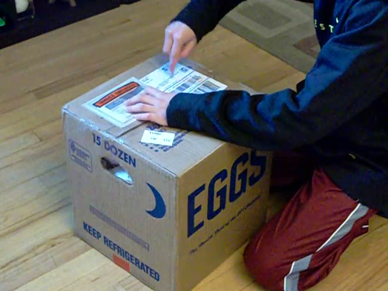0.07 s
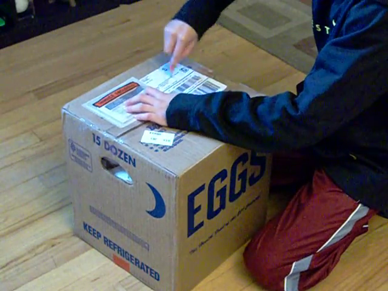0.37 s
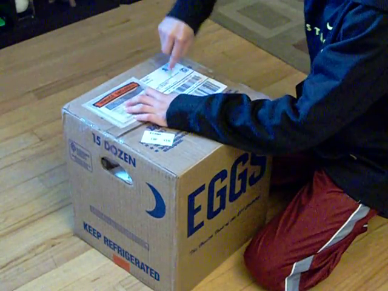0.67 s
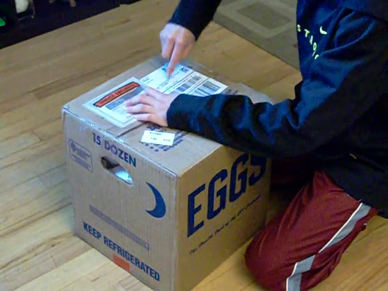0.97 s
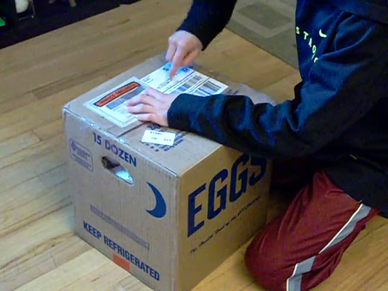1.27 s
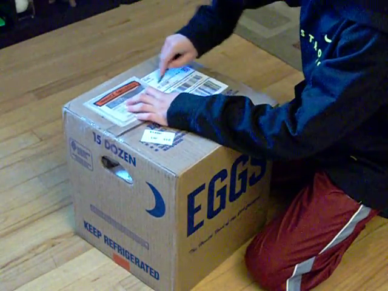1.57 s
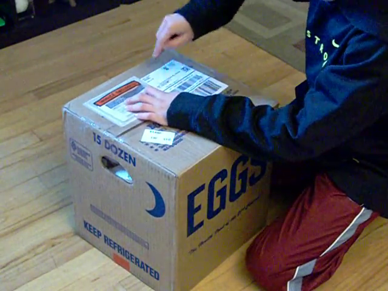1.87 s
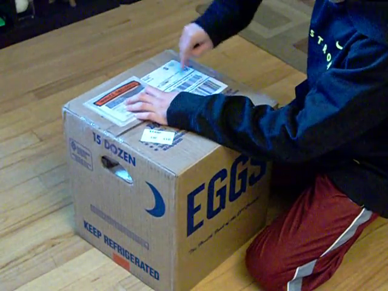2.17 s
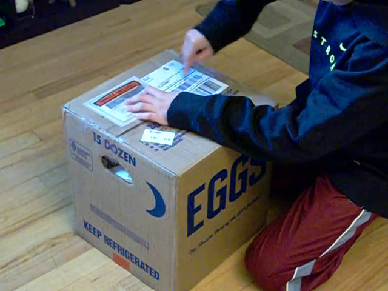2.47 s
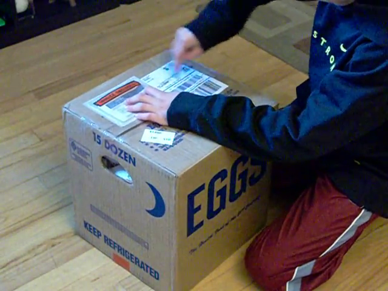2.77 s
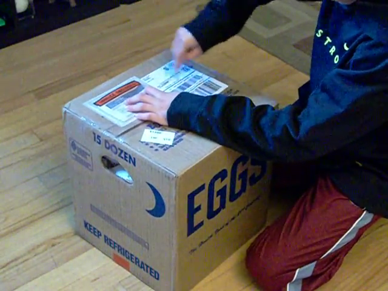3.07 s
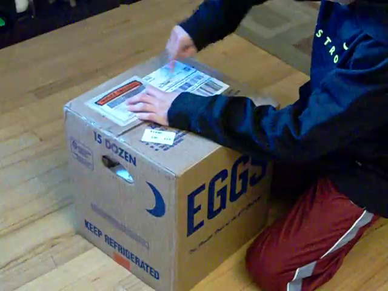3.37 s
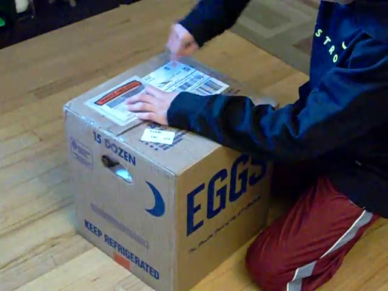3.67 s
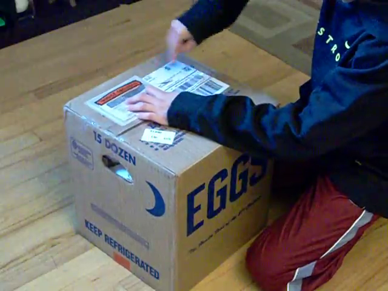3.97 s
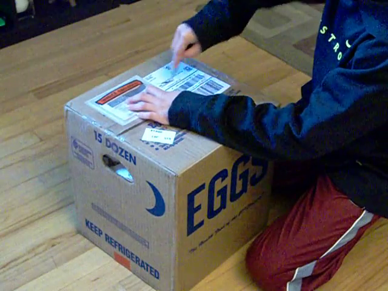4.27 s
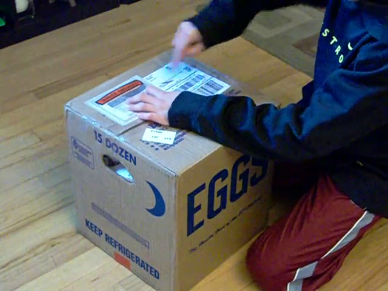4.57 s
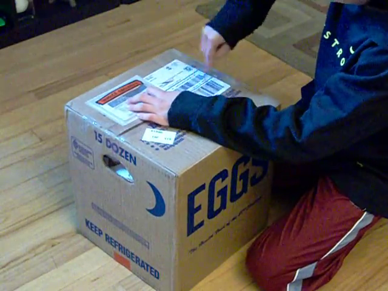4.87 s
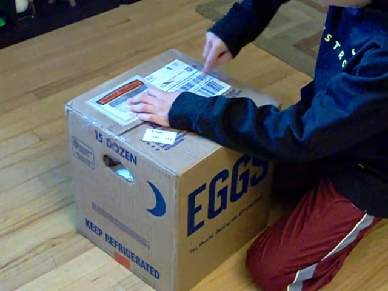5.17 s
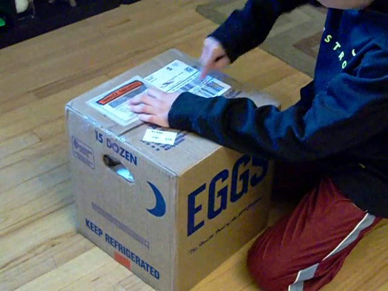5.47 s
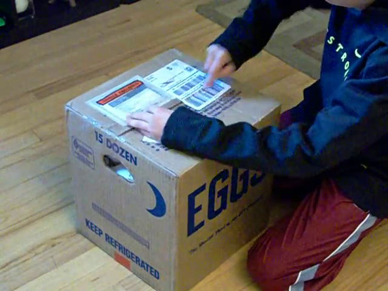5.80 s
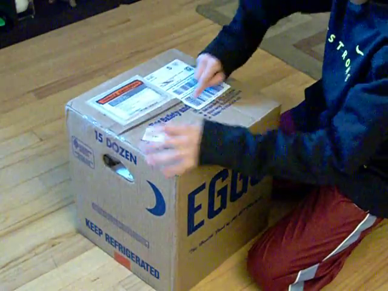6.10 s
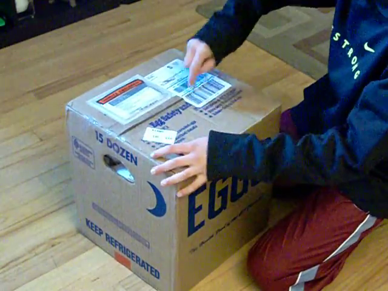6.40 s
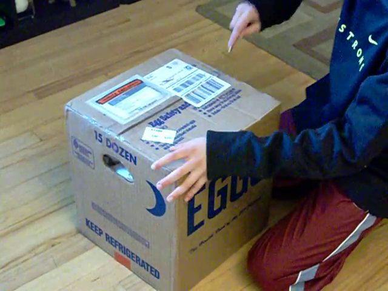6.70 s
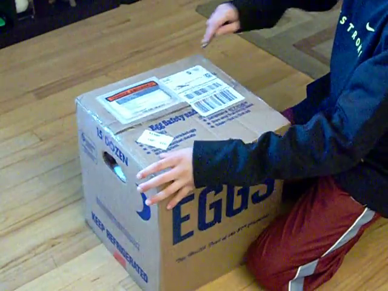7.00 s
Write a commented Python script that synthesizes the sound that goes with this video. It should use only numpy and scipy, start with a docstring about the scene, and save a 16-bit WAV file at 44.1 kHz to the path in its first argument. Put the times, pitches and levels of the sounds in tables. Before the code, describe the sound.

A fingernail lands on the taped lid of a big cardboard box and drags across it, about three strokes a second. Each stroke gives a hollow knock and a short rasp, with crisp snaps off creases and a plastic label. A few thin squeaks slip in. Near the end a hand slides softly over the cardboard among tiny clicks. It sounds close, in a small room with faint rumble and hiss.

```python
"""A fingernail lands on the taped top of a big cardboard box and drags across it, about three strokes a second.
Each impact knocks the hollow box; stick-slip friction makes the nail rasp over the tape and the fingertip
squeak, and the nail snaps off creases and the edges of a plastic label. The spot on the lid colours a
stroke's landing, drag and snaps alike. The panels and enclosed air resonate briefly, and a room with a
wooden floor answers. Behind it lie a sliding hand, small ticks, rustling sleeves, faint rumble and hiss."""
import sys
import numpy as np
from scipy import signal
from scipy.fft import rfft, irfft
from scipy.io import wavfile
from scipy.ndimage import uniform_filter1d

SR = 44100
rng = np.random.default_rng(int(sys.argv[2]) if len(sys.argv) > 2 else 0)


def store_pcm(level_fs):
    """Save levels as 16-bit WAV."""
    pcm = np.round(np.clip(level_fs, -1, 1) * 32767).astype(np.int16)
    wavfile.write(sys.argv[1], SR, np.atleast_2d(pcm).T)


N = 310464
FREQS = np.fft.rfftfreq(16384, 1 / SR)
# Strokes of the finger. Each row: start and length in seconds; relative levels in dB of landing, nail
# click, rasp, swell along the drag, push into the box and stiffness of the spot; film resonance in Hz.
STROKES = [(0, 0.18, -34, -33, -59.5, 0, -3, 10, 5700), (0.293, .17, -12, -24, -56, -8, -2, 6, 6200),
           (0.5754, .16, -15, -23.5, -57.5, -2.5, 3.5, 5.5, 2750),
           (0.923, 0.14, -18, -22, -54.5, 6, -2, -0.5, 6000),
           (1.234, 0.069, -12.5, -19, -49.5, 9, 2.5, 4.5, 2660),
           (1.5362, .18, -22.5, -33, -64, 16.5, -1.5, 5, 2390),
           (2.0073, .15, -18.5, -26, -61, 14, 3.5, 4.5, 2000),
           (2.342, 0.12, -20.5, -29, -56, 7.5, -2.5, 5.5, 2980),
           (2.634, 0.13, -22.5, -24.5, -55, -5.5, -4, 6, 1930),
           (2.9207, 0.16, -20.5, -22, -59, -4, 0.5, -2.5, 3140),
           (3.225, 0.067, -22.5, -31, -53.5, 1.5, 1.5, 7.5, 1440),
           (3.5324, 0.099, -21, -29, -54, -17, 2, 6.5, 1480),
           (3.8127, 0.14, -19.5, -27, -57.5, 10.5, 2, 4, 3720),
           (4.109, 0.13, -15.5, -23.5, -53.5, -1, -3, 6, 1230),
           (4.3815, .145, -19.5, -20, -53, 4.5, -2, -4, 4200),
           (4.6922, .18, -15, -18, -48, 2.5, -5.5, -3, 7060),
           (5.0624, 0.18, -16.5, -22, -49.5, 0, -3.5, -5, 4050),
           (5.424, .16, -15.5, -17.5, -49.5, 5, -2.5, -1, 6900),
           (5.7791, 0.13, -13, -18, -50, 17.5, -7, -1, 7040),
           (6.12, 0.126, -12, -24, -57, 33, -2.5, -2, 7200),
           (6.4798, 0.16, -17.5, -26.5, -58, 18.5, -7.5, -3.5, 2110)]


def undb(db):
    """Amplitude ratio for a level in decibels."""
    return 10 ** (np.asarray(db) / 20)


def slope(points):
    """Gain in dB at every frequency, joining (Hz, dB) points on a log axis."""
    hz, db = np.transpose(points)
    return np.interp(np.log(FREQS + 1), np.log(hz), db)


def resonances(modes):
    """Gain in dB of Lorentzian peaks, each given as (Hz, width in Hz, height in dB)."""
    return sum(db / (1 + (2 * (FREQS - hz) / width) ** 2) for hz, width, db in modes)


def response(db):
    """Minimum-phase impulse response with the given gain in dB."""
    cepstrum = irfft(np.log(undb(db)))
    half = len(cepstrum) // 2
    cepstrum[1:half] *= 2
    cepstrum[half + 1:] = 0
    return irfft(np.exp(rfft(cepstrum)))[:half]


def through(x, h):
    """Linear filtering: convolution with an impulse response."""
    return signal.fftconvolve(x, h)[:len(x)]


def add(track, s, sound):
    """Superposition: a sound joins the track at s seconds."""
    i = max(int(s * SR), 0)
    track[i:i + len(sound)] += sound[:N - i]


def walk(count, rate_hz):
    """Slow random modulation with a spread near 1."""
    place = np.arange(count) * rate_hz / SR
    return np.interp(place, np.arange(count), rng.standard_normal(count))


def crackle(envelope, evenness):
    """A noise burst of unit energy; evenness from 0 to 1 whitens its spectrum."""
    spectrum = rfft(rng.standard_normal(len(envelope)) * envelope)
    burst = irfft(spectrum / np.abs(spectrum) ** evenness, len(envelope))
    return burst / np.linalg.norm(burst)


def ambience(waver_db=1.3):
    """Broadband noise of the house: rumble and hiss, wavering slightly in amplitude."""
    # Noise spectrum. Each row: frequency in Hz, gain in dB.
    spectrum = [(20, -31.5), (32, -31), (50, -31.5), (80, -31), (140, -39.5), (220, -44), (400, -47),
                (800, -53.5), (1500, -55), (3000, -60), (7000, -63.5)]
    noise = through(rng.standard_normal(N), response(slope(spectrum)))
    return noise * undb(waver_db * walk(N, rate_hz=10))


def sleeves(level_db=-64, swell_db=3, grains_hz=900):
    """Cloth friction as the arms move: sparse random impulses sum to a faint rustle."""
    grains = (rng.random(N) < grains_hz / SR) * rng.standard_normal(N)
    colour = response(slope([(300, -14.5), (2000, -7.0), (4000, 3.0), (7000, -10)]))
    return through(grains / np.std(grains), colour) * undb(level_db + swell_db * walk(N, rate_hz=20))


def ticks(decay_s=0.001):
    """Tiny bright clicks, so close that only their direct sound is heard."""
    # Dry clicks. Each row: start in seconds, relative level in dB.
    clicks = [(5.6652, -13.5), (6.034, -24), (6.0842, -12.5), (6.107, -12), (6.4692, -14), (6.7882, -17.5),
              (6.885, -22.5)]
    out = np.zeros(N)
    t = np.arange(SR // 100) / SR
    colour = response(slope([(500, -13), (3500, -4), (7000, -8.5)]))
    for s, db in clicks:
        add(out, s, undb(db) * through(crackle(np.exp(-t / decay_s), evenness=0), colour))
    return out


def echoes(t60_s=0.25, late_t60_s=0.65, late_db=-17, build_s=0.0015, floor_s=0.0052, floor_db=-4):
    """Room impulse response: direct sound, a scattered floor reflection and a two-slope diffuse decay."""
    # Spectrum of the reflections. Each row: frequency in Hz, gain in dB against the direct sound.
    reflection_gain = [(60, -7.5), (200, -4), (500, 3), (1200, 1), (3000, -1.5), (8000, -1.5)]
    t = np.arange(SR // 2) / SR
    fade = undb(-60 * t / t60_s) + undb(late_db - 60 * t / late_t60_s)
    tail = rng.standard_normal(len(t)) * (1 - np.exp(-t / build_s)) * fade
    bounce = crackle(np.exp(-np.abs(t - floor_s) / 0.00049), evenness=0.79)
    reflections = tail / np.linalg.norm(tail) + undb(floor_db) * bounce
    h = signal.unit_impulse(len(t)) + through(reflections, response(slope(reflection_gain)))
    # the echoes spread the sound in time but leave its broad colour alone
    power = uniform_filter1d(np.abs(rfft(h, 2 * len(FREQS) - 2)) ** 2, size=24)
    return through(h, response(-10 * np.log10(power)))


def room(x, level_db=-1.88):
    """Reverberation depends on source position, so each stroke has its own pattern of echoes."""
    out = np.zeros(N)
    starts = [0] + [int(stroke[0] * SR) for stroke in STROKES[1:]] + [N]
    for a, b in zip(starts, starts[1:]):
        add(out, a / SR, signal.fftconvolve(x[a:b], echoes()))
    return out * undb(level_db)


def box(force):
    """Forced vibration: the cardboard radiates the force on its lid, ringing at its modes."""
    # Broad radiation curve of the box. Each row: frequency in Hz, gain in dB.
    radiation = [(20, 10.5), (50, 19.5), (95, 20), (140, 28), (220, 30.5), (300, 23.5), (500, 19.5),
                 (800, 22), (1050, 14.5), (2200, 14.5), (3500, 15), (5500, 13.5), (7300, 10.5)]
    # Modes of the enclosed air and panels. Each row: frequency and width in Hz, dB above that curve.
    modes = [(49.8, 9.3, 17), (137.6, 5.6, 7), (179.2, 10, 6.5), (201.1, 9.3, 2), (236.6, 24.7, 7.5),
             (345.6, 44, 7), (422, 25, 4), (447.2, 20, 6), (494, 31, 5), (635.2, 69, 6.5), (733, 22, 3),
             (783, 7.9, -1.5), (839, 40, 2.5), (935, 22, 4.5), (1176, 47, 2), (1446, 44, 1.5),
             (3250, 81, 1.5)]
    return through(force, response(slope(radiation) + resonances(modes)))


def spot(db, stiffness_db):
    """Contact stiffness trades low thud for higher knock; gives the two levels in dB."""
    return db - stiffness_db / 2, db + stiffness_db / 2


def contact(thud_db, knock_db, crack_db, film_hz):
    """Force pulse of a contact: three spectral regions plus the damped resonance of the patch of film."""
    spectrum = slope([(256, thud_db), (775, knock_db), (2700, crack_db)])
    return response(spectrum + resonances([(film_hz, 0.26 * film_hz, 4)]))


def effort(along, rasp_db, swell_db, arch_db=1.5):
    """Friction level in dB along a stroke (0 to 1): a ramp, arched midway where the motion is fastest."""
    along = np.clip(along, 0, 1)
    return rasp_db + swell_db * (along - .5) + arch_db * (np.sin(np.pi * along) - .5)


def rub(length, level_db, swell_db, slips_hz=1300, scatter_db=5.0, grip_db=4.0, lift_s=0.019):
    """Stick-slip friction, 0.25 s at most: tiny uneven slips over a hiss, under a wavering grip."""
    t = np.arange(SR // 4) / SR
    sizes = undb(scatter_db * np.minimum(rng.exponential(size=len(t)), 3))
    slips = (rng.random(len(t)) < slips_hz / SR) * sizes * rng.choice([-1, 1], len(t))
    rasp = slips / np.std(slips) + undb(-5) * rng.standard_normal(len(t))
    db = effort(t / length, level_db, swell_db) + grip_db * walk(len(t), rate_hz=150)
    touching = np.clip(t / 0.0034, 0, 1) * np.clip((length - t) / lift_s + .5, 0, 1)
    return rasp * undb(db) * touching


def hand_slides():
    """Sliding friction of the steadying hand on the cardboard."""
    # Hand movements. Each row: start in seconds, nominal length in seconds, relative level in dB.
    slides = [(5.602, 0.21, -61.5), (5.951, 0.28, -64), (6.879, 0.29, -67)]
    force = np.zeros(N)
    palm = contact(thud_db=-10, knock_db=-10, crack_db=-4, film_hz=2150)
    for s, length, db in slides:
        add(force, s, through(rub(length, db, swell_db=0), palm))
    return force


def squeaks():
    """Periodic stick-slip: on smooth tape the fingertip's slips fall into step as a thin wavering tone."""
    # Squeaks. Each row: start and length in seconds, pitch and its wander in Hz, relative level in dB.
    tones = [(1.6, 0.017, 3450, 220, -48), (1.634, 0.014, 3230, 200, -46), (1.685, 0.013, 2480, 180, -35.5),
             (3.022, 0.1, 2084, 50, -55), (3.67, 0.09, 3320, 29, -54), (3.738, 0.063, 3335, 24, -49),
             (3.798, 0.16, 3360, 23, -56)]
    out = np.zeros(N)
    t = np.arange(SR // 5) / SR
    for s, length, hz, wander_hz, db in tones:
        phase = 2 * np.pi * np.cumsum(hz + wander_hz * walk(len(t), rate_hz=680)) / SR
        envelope = np.sin(np.pi * np.minimum(t / length, 1))
        add(out, s, undb(db) * envelope * np.sin(phase))
    return out


def blows(events, catch_s, fall_s, again_db, again_s, spread_s, split_hz, film_db, evenness):
    """Impulsive forcing: the lid dents; the film crackles as the nail catches, slips and strikes again."""
    force = np.zeros(N)
    lead = SR // 100
    t = np.arange(-lead, 5 * lead) / SR
    after = np.exp(-np.abs(t) / fall_s) + undb(again_db) * np.exp(-np.abs(t - again_s) / spread_s)
    envelope = np.where(t < 0, np.exp(-np.abs(t) / catch_s), after)
    # the heavy lid carries the lows, the light film the highs
    dent = signal.lfilter(*signal.butter(2, split_hz, fs=SR), signal.unit_impulse(len(t), lead))
    for s, *colour in events:
        film = signal.lfilter(*signal.butter(2, split_hz, "high", fs=SR), crackle(envelope, evenness))
        add(force, s - lead / SR, through(undb(film_db) * film - dent, contact(*colour)))
    return force


def edges():
    """Sudden release at edges of tape or label: blows coloured by the spot that the stroke crosses."""
    # Slips off an edge. Each row: time in seconds, relative levels in dB of crack and jolt to the box.
    releases = [(0.053, -24, -27), (0.1049, -24, -31), (0.37, -22.5, -30), (0.5813, -18.5, -21.5),
                (0.6404, -17, -23), (0.6822, -18, -9.5), (0.7028, -20, -37), (0.9318, -25.5, -31),
                (0.9604, -16.5, -10.5), (1.05, -25, -45), (1.274, -16.5, -9.5), (1.4276, -35, -27),
                (1.6917, -24, -12.5), (2.0672, -17.5, -11.5), (2.0929, -21.5, -16.5), (2.1108, -22.5, -31),
                (2.1508, -24, -43), (2.3633, -20, -8.5), (2.4279, -22.5, -26), (2.7117, -24.5, -15.5),
                (2.7331, -20.5, -25), (2.984, -29.5, -21.5), (3.025, -24.5, -20), (3.23, -26, -29),
                (3.256, -22, -32), (3.2714, -14.5, -6.5), (3.3954, -37.5, -42), (3.5578, -21, -9),
                (3.6724, -30.5, -23.5), (3.8505, -27, -32), (3.8938, -25, -21), (3.9231, -23, -47),
                (4.1495, -27, -20), (4.194, -21.5, -33), (4.3873, -25, -29), (4.4594, -24, -21.5),
                (4.8053, -19, -21), (5.0981, -21, -17.5), (5.1141, -15.5, -15.5), (5.1487, -15.5, -13),
                (5.169, -17.5, -19.5), (6.226, -8, -10.5)]
    events = []
    for s, crack_db, jolt_db in releases:
        *_, stiffness_db, film_hz = [stroke for stroke in STROKES if stroke[0] <= s][-1]
        events.append((s, *spot(jolt_db, stiffness_db), crack_db, film_hz))
    return events


def creases(count=6, per_s=13, over_rasp_db=27.5, scatter_db=1, jolt_db=-8, smooth_from_s=5.3):
    """Surface roughness: creases catch the nail at random, as strongly as it rasps there."""
    events = []
    for s, length, _, _, rasp_db, swell_db, push_db, stiffness_db, _ in STROKES:
        delays = np.cumsum(rng.gamma(2, .5, count)) / per_s
        for delay, (weakness, pitch) in zip(delays, rng.standard_normal((count, 2))):
            if delay < length and s < smooth_from_s:  # the last strokes glide over smooth label
                db = effort(delay / length, rasp_db, swell_db) + over_rasp_db - scatter_db * weakness
                film_hz = 4200 * np.exp(0.18 * pitch)
                events.append((s + delay, *spot(db + push_db + jolt_db, stiffness_db), db, film_hz))
    return events


def snaps(level_db=-0.5):
    """Free vibration: the plastic pings briefly when an edge or crease lets the nail go."""
    # Modes of the plastic. Each row: frequency in Hz, width in Hz, height in dB.
    modes = [(3250, 290, 3.5), (3960, 570, 2.5), (6820, 840, 5)]
    force = blows(edges() + creases(), catch_s=0.0011, fall_s=0.0015, again_db=-12.5, again_s=0.0035,
                  spread_s=0.0045, split_hz=1040, film_db=1.0, evenness=0.35)
    return through(force, response(level_db + resonances(modes)))


def finger_pad(rasp, length, swell_db, cutoff_hz=1900, ease_db=-4):
    """Soft contact carries the lows: they follow half the swell and fade as the fingertip eases off."""
    along = np.clip(np.arange(len(rasp)) / SR / length, 0, 1)
    dull = signal.filtfilt(*signal.butter(2, cutoff_hz, fs=SR), rasp)
    return rasp - dull + dull * undb((ease_db - .5 * swell_db) * (along - .5))


def drags(stiffness_share=0.36):
    """Stick-slip friction of the nail after each landing, filtered by its spot on the lid."""
    force = np.zeros(N)
    for s, length, _, _, rasp_db, swell_db, push_db, stiffness_db, film_hz in STROKES:
        colour = contact(*spot(push_db, stiffness_share * stiffness_db), crack_db=-4, film_hz=film_hz)
        rasp = finger_pad(rub(length, rasp_db, swell_db), length, swell_db)
        add(force, s, through(rasp, colour))
    return force


def landings(nail_hz=2950, cushion_hz=4350):
    """Impact of fingertip and nail opens each stroke; the compliant flesh acts as a low-pass filter."""
    events = [(s, *spot(landing_db, stiffness_db), click_db, nail_hz)
              for s, _, landing_db, click_db, _, _, _, stiffness_db, _ in STROKES]
    force = blows(events, catch_s=0.0001, fall_s=0.0017, again_db=-7, again_s=0.0053,
                  spread_s=0.0046, split_hz=1100, film_db=2.0, evenness=0.33)
    return signal.lfilter(*signal.butter(1, cushion_hz, fs=SR), force)


def scene():
    """Source and filter: the contact forces sum and drive one box in one room, over a faint background."""
    force = landings() + snaps() + drags() + hand_slides()
    return (room(box(force) + squeaks()) + ticks() + sleeves() + ambience())[None]


def record(dry, cutoff_hz=8800):
    """Band limiting: the microphone falls off in the upper treble and is cut above it."""
    mic = response(slope([(7550, 0), (8100, -14), (8800, -17)]))
    lowpass = signal.ellip(10, .2, 70, cutoff_hz, fs=SR, output="sos")
    return signal.sosfilt(lowpass, through(dry[0], mic))[None]


dry = scene()
out = record(dry)
store_pcm(out)
```